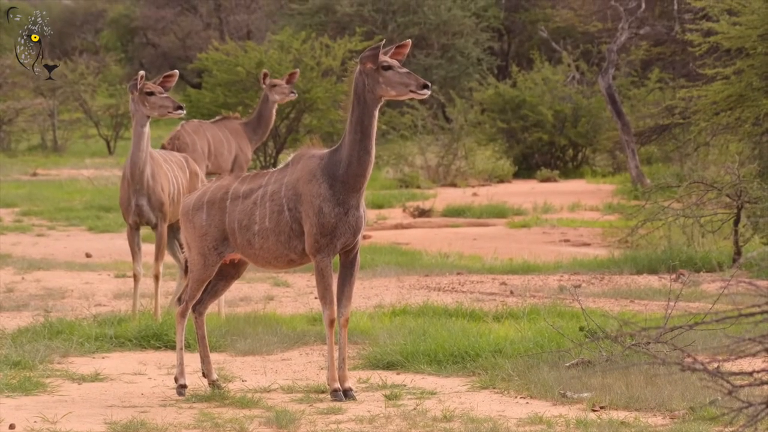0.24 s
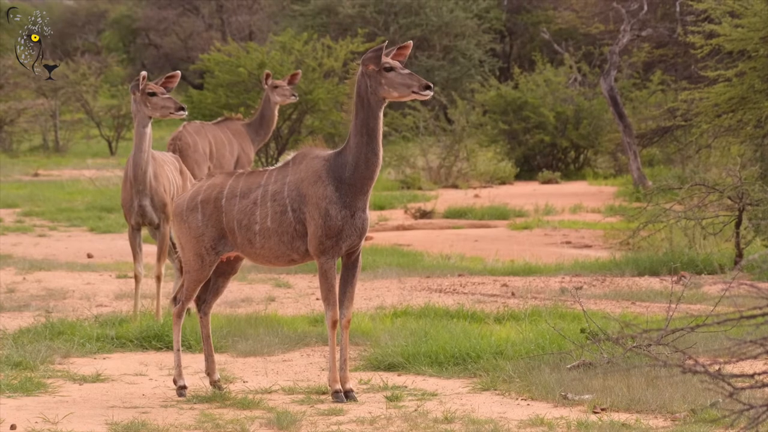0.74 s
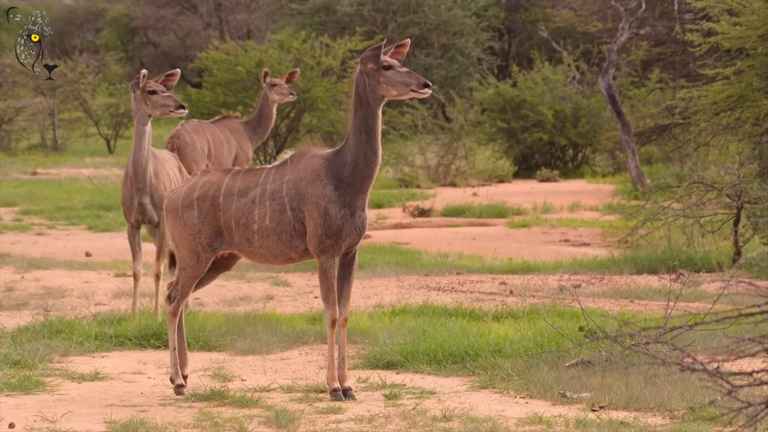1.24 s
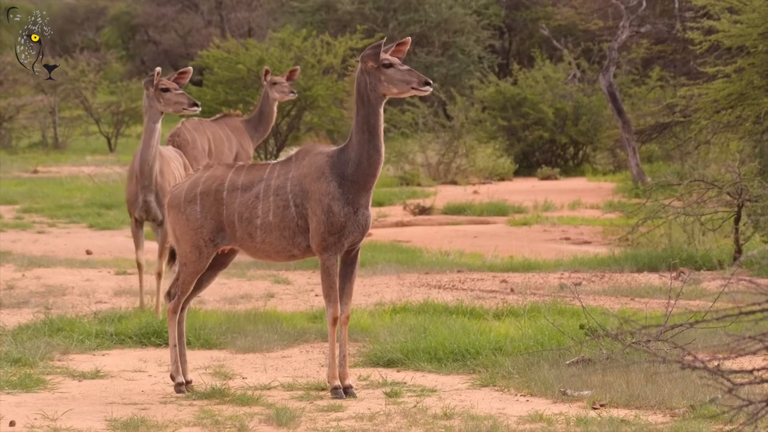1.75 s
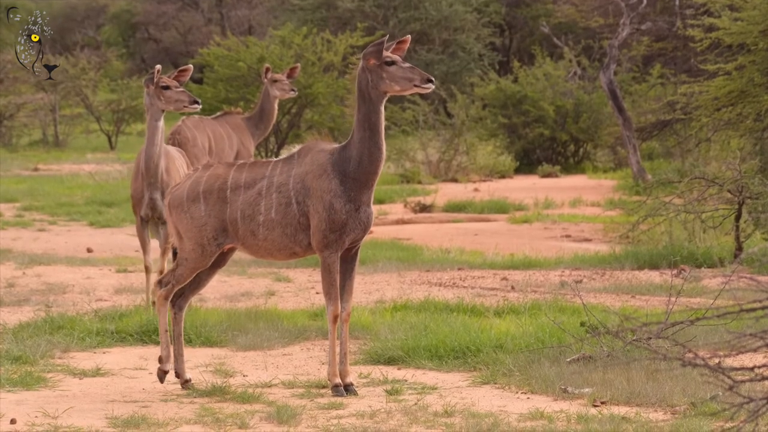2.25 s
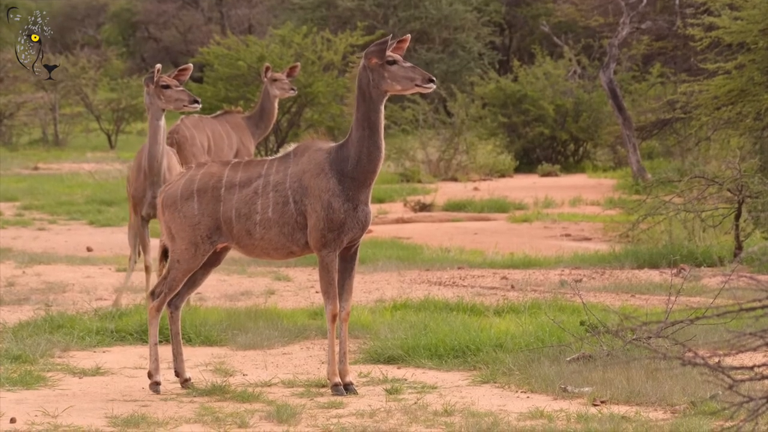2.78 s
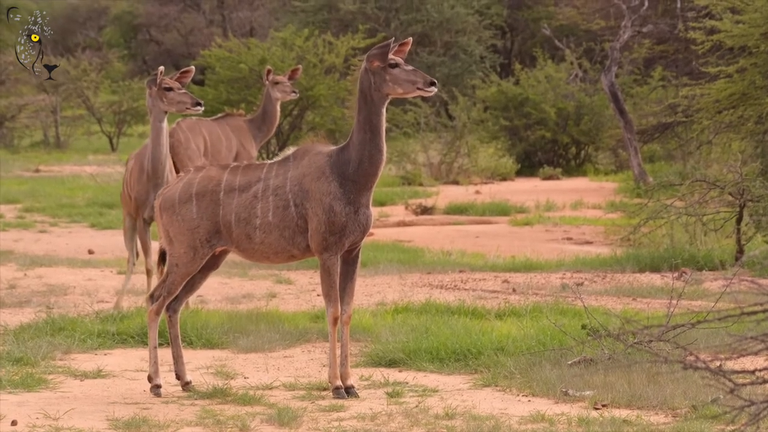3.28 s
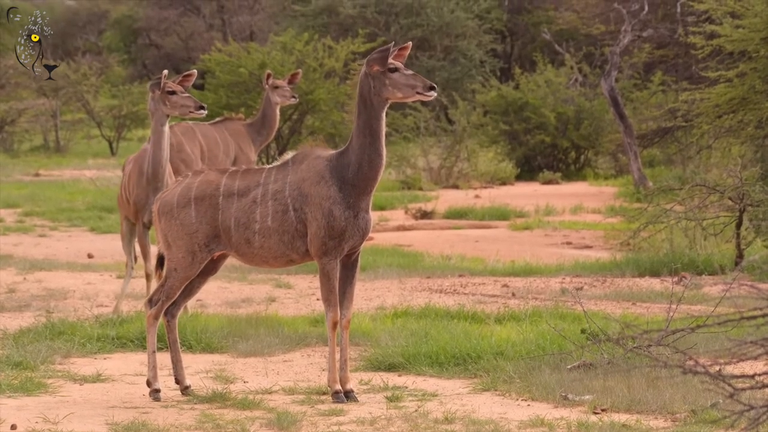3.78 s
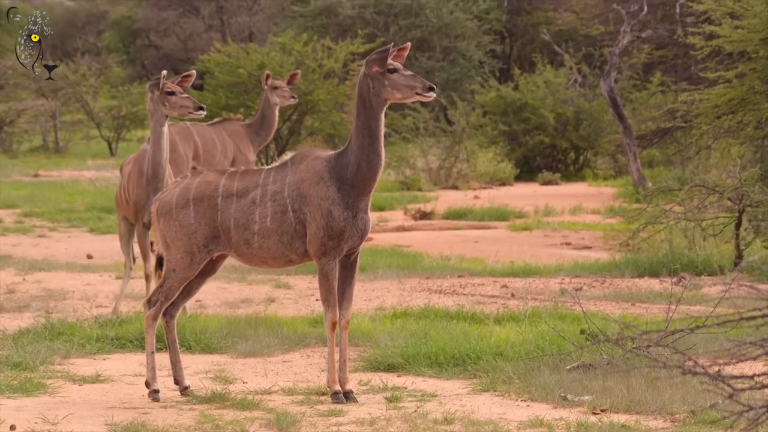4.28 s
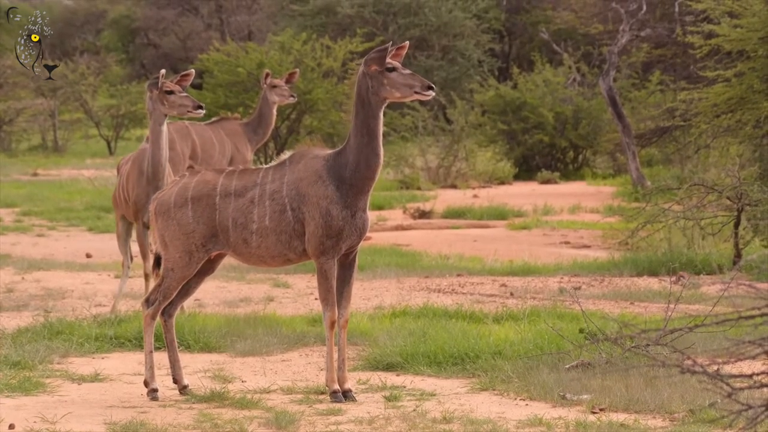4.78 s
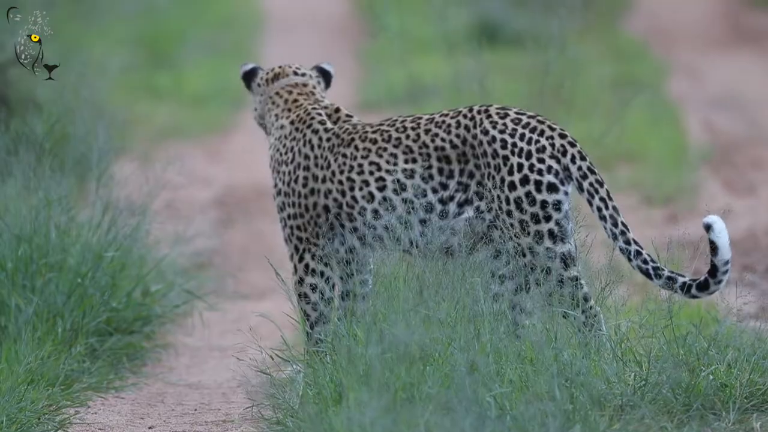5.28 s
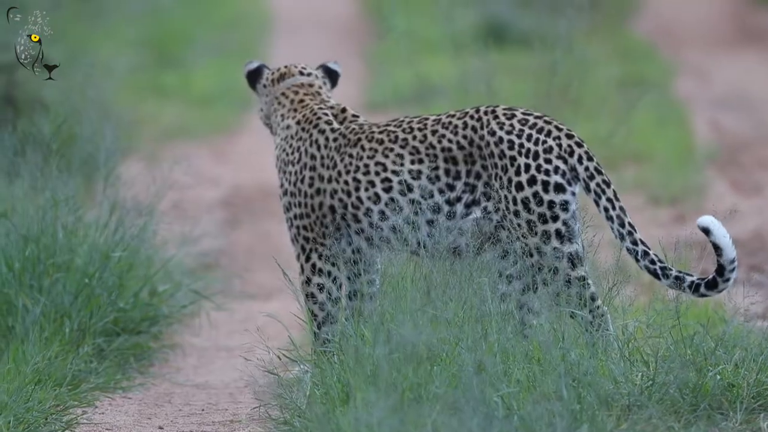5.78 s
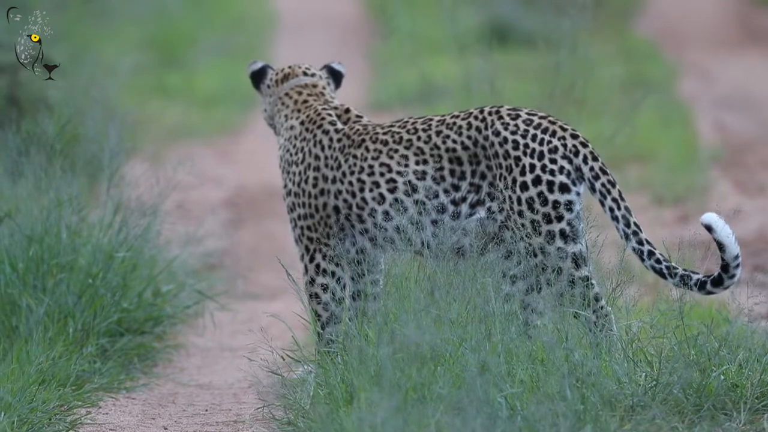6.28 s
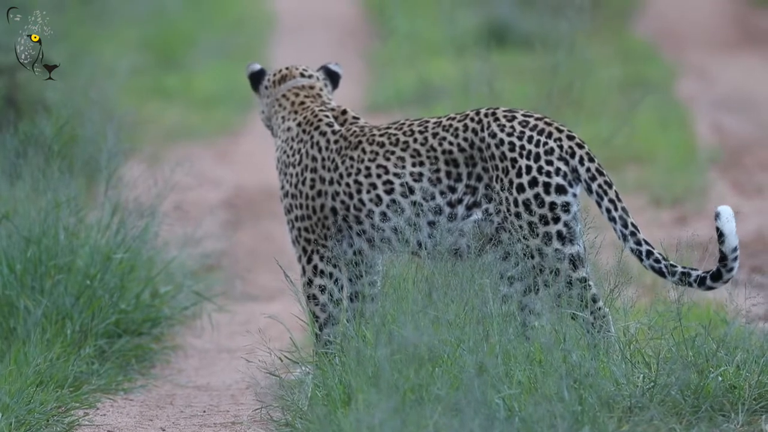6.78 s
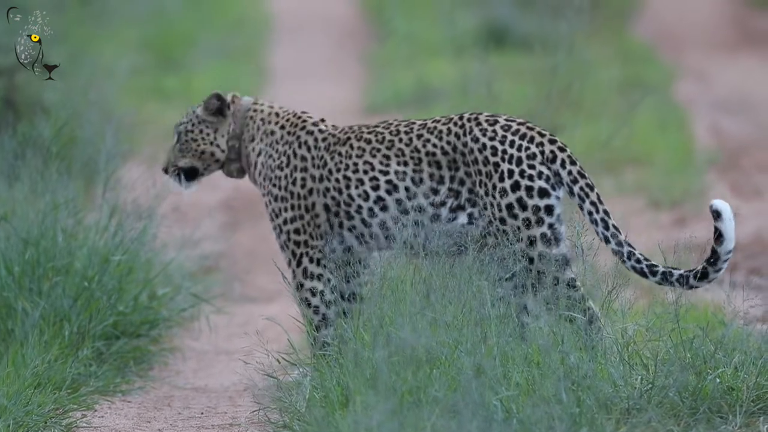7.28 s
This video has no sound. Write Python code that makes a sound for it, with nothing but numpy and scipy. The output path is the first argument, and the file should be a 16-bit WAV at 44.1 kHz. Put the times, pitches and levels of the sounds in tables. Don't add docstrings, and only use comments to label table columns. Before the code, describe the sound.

A dove coos in a regular cycle of one arched note, a throbbing trill and a short note, nearly pure in tone. Around it are faint distant birds, dry twig ticks and light wind rumble against a stereo microphone, stronger on the right. A raspy antelope alarm bark is already sounding at the start; another, equally loud and close, erupts near the end with scattered echoes.

```python
import sys
import numpy as np
from scipy import signal
from scipy.io import wavfile
from scipy.ndimage import uniform_filter1d

SR = 44100
rng = np.random.default_rng(int(sys.argv[2]) if len(sys.argv) > 2 else 0)


def voltage_ratio(decibels):
    exponent = np.asarray(decibels, float) / 20
    return 10 ** exponent


def unload_audio(sound):
    columns = np.transpose(np.atleast_2d(sound))
    steps = np.round(np.clip(columns, -1, 1) * 32767)
    wavfile.write(sys.argv[1], SR, steps.astype(np.int16))


N = 332514


def evened(x):
    return x / np.sqrt(np.mean(x ** 2) + 1e-20)


def read(points, hz):
    f, value = np.transpose(points)
    return np.interp(np.log(hz + 1), np.log(f + 1), value)


def unroll(rows):
    s, *columns = np.transpose(rows)
    t = np.arange(s[0], s[-1], 1 / SR)
    return s[0], [np.interp(t, s, c) for c in columns]


def add(mix, s, sound):
    sound = sound[..., max(round(-s * SR), 0):]
    part = mix[..., max(round(s * SR), 0):][..., :sound.shape[-1]]
    part += sound[..., :part.shape[-1]]


def resonate(x, hz, width_hz):
    turn = np.exp(2j * np.pi * np.cumsum(hz * np.ones(len(x))) / SR)
    r = np.exp(-np.pi * width_hz / SR)
    smooth = signal.lfilter([(1 - r) ** 2], [1, -2 * r, r * r], x / turn + 1e-18)
    return 2 * (turn * smooth).real


def tone(hz, level_db):
    ends = signal.windows.tukey(len(hz), min(1, 300 / len(hz)))
    return np.sqrt(2) * voltage_ratio(level_db) * ends * np.sin(2 * np.pi * np.cumsum(hz) / SR)


def noise(shape_db, patchy_db):
    draws = rng.standard_normal((3, N // 256 + 5, 2, 513))
    real, imaginary, patches = draws.transpose(0, 2, 3, 1)
    patches = evened(uniform_filter1d(uniform_filter1d(patches[0], 10, 0), 12, 1))
    z = (real + 1j * imaginary) * voltage_ratio(shape_db[:, :, None] + patchy_db * patches)
    return signal.istft(z, nperseg=1024, noverlap=768)[1][:, :N]


# pitch_hz [Hz], level_db [dB per Hz]
HUSH_SPECTRUM = [(60, 4.5), (100, 5.5), (200, 1), (400, -3.5), (630, -2.5), (1000, -7), (2000, -11),
                 (4000, -16), (6300, -20.5), (8500, -23), (10300, -29), (11800, -26.5), (13000, -21.5),
                 (16000, -22.5)]
# pitch_hz [Hz], side_re_mid_db [dB]
HUSH_SIDE_SPECTRUM = [(100, -24), (300, -9.5), (900, -14.5), (2500, -11), (5000, -18.5), (10000, -11),
                      (12500, -13.5), (16000, -26)]


def hush():
    hz = np.fft.rfftfreq(1024, 1 / SR)
    mid_db = read(HUSH_SPECTRUM, hz)
    side_db = mid_db + read(HUSH_SIDE_SPECTRUM, hz)
    mid, side = noise(np.array([mid_db, side_db]), patchy_db=.6)
    return voltage_ratio(-53.5) * np.array([mid + side, mid - side]) / np.std(mid)


# start_s [s, centre], half_width_s [s], level_db [dB], left_right_db [dB]
GUST_EVENTS = [(.2, 0.19, -49, -8), (.84, .08, -59, -5), (1.19, 0.074, -59.5, -18), (1.3, 0.029, -58, -4),
               (1.97, .15, -62.5, -6), (3.14, 0.093, -49.5, -20), (3.36, 0.086, -55, -9),
               (3.78, 0.11, -56.5, -5), (3.97, 0.077, -54.5, -18), (4.43, 0.078, -60, -1),
               (5.05, 0.091, -51.5, -19), (5.27, 0.11, -59.5, -1.5), (5.56, 0.14, -53, -15),
               (5.92, 0.033, -51.5, -15), (6.8, 0.1, -51.5, -11), (7.43, 0.025, -60, -13)]
# pitch_hz [Hz], level_db [dB per Hz]
BUFFET_SPECTRUM = [(8.8, -59), (15, -6), (32, 10.5), (54, -7.5), (113, -12.5), (145, -18), (231, -34),
                   (400, -42), (520, -60.5), (880, -120)]


def wind():
    hz, t = np.fft.rfftfreq(1024, 1 / SR), np.arange(N) / SR
    ports = noise(np.array([read(BUFFET_SPECTRUM, hz)] * 2), patchy_db=2.0)
    calm = (0, np.inf, -63, -5)
    power = 0
    for s, half_s, level_db, pan_db in GUST_EVENTS + [calm]:
        share = voltage_ratio(np.array([[pan_db], [-pan_db]]))
        swell = np.exp(-((t - s) / half_s) ** 2)
        power = power + share / share.sum() * voltage_ratio(2 * level_db) * swell
    return evened(ports) * np.sqrt(power) * voltage_ratio(14.5)


# start_s [s], peak_db [dB], pitch_hz [Hz, centre], width_hz [Hz], t60_s [s]
TWIG_TICKS = [
    (1.2, -45, 1900, 1200, .03),
    (1.408, -46, 11000, 9000, .008),
    (2.4415, -36, 13300, 2800, .006),
    (4.811, -42, 2000, 1400, .022),
    (5.2446, -44, 2400, 2200, .022),
    (5.594, -50, 11000, 7000, .008),
    (5.92, -43, 1900, 1500, .022),
]
HOOF_THUDS = [
    (0.739, -34, 397, 700, 0.076),
    (0.774, -31, 380, 1050, 0.12),
    (.78, -33.5, 142, 152, 0.057),
]
PORT_KNOCKS = [
    (0.776, -44, 2160, 2500, .025),
    (3.04, -37.5, 133, 109, 0.027),
    (3.312, -37.5, 98, 89, 0.11),
    (5.077, -35, 69.5, 69.4, 0.034),
]


def tick(s, peak_db, hz, width_hz, t60_s, pan_db=0):
    t = np.arange(6000) / SR
    burst = resonate(rng.standard_normal(len(t)) * voltage_ratio(-60 * t / t60_s), hz, width_hz)
    return s, voltage_ratio(peak_db + np.array([[pan_db], [-pan_db]]) / 2) * burst / abs(burst).max()


def whistle(level_db, hz, fuzz):
    blur = evened(resonate(rng.standard_normal(len(hz)), hz, 650))
    blur = voltage_ratio(level_db) * blur * signal.windows.tukey(len(hz), .3)
    return (1 - fuzz) * tone(hz, level_db) + fuzz * blur


# start_s [s], length_s [s], level_db [dB], first_hz [Hz], last_hz [Hz]
FAR_NOTES = [
    (2.36, .13, -63, 1790, 1830),
    (2.38, .07, -65, 2200, 2100),
    (2.58, .05, -63, 1800, 1750),
    (2.78, .08, -62, 1860, 1800),
    (4.93, .13, -63, 1760, 1850),
    (5.08, .12, -61.5, 1830, 1760),
    (5.26, .08, -64, 1850, 1850),
    (5.48, .12, -64, 1800, 1800),
]
QUICK_NOTES = [
    (.65, .018, -54, 2330, 2420),
    (.705, .025, -50, 3150, 2500),
    (.728, .028, -48.5, 1920, 2120),
    (.834, .064, -60, 3300, 1280),
    (3.038, .076, -59, 3400, 2250),
    (3.89, .1, -66, 1404, 1423),
]
HOARSE_SWOOPS = [
    (3.015, .115, -57.5, 6750, 3150),
    (3.02, .07, -63, 5600, 4300),
]


def drop(s, length_s, level_db, first_hz, last_hz, haste, delay, fuzz):
    u = np.arange(0, length_s, 1 / SR) / length_s
    pitch_hz = last_hz + (first_hz - last_hz) * np.exp(-(haste * u) ** delay)
    return s, whistle(level_db - 9 * (u - .2) ** 2, pitch_hz, fuzz)


# start_s [s], length_s [s], level_db [dB], first_hz [Hz], flick_hz [Hz]
HELD_NOTES = [
    (.455, .137, -50, 3130, -900),
    (.44, .128, -55.5, 3610, -130),
    (.45, .126, -61.5, 1820, -150),
    (.653, .054, -53, 2050, 190),
]


def held(s, length_s, level_db, hz, flick_hz):
    sag_hz_per_s, swell_db = 850, -12
    u = np.arange(0, length_s, 1 / SR) / length_s
    flick = u ** 10
    pitch_hz = hz - sag_hz_per_s * length_s * u + flick_hz * flick
    level_db = level_db + swell_db * np.exp(-u / .15) - 4 * flick
    return s, whistle(level_db, pitch_hz, fuzz=.07 + .5 * flick)


# start_s [s after onset], level_db [dB], pitch_hz [Hz]
ARCH_SHAPE = [(0, -6, 713), (.006, 1.5, 830), (.016, -1.5, 942), (.032, -2.5, 985), (.064, 0.5, 905),
              (.074, -6, 792), (.088, -7.5, 690)]
SHORT_SHAPE = [(0, -16, 680), (.008, -5, 760), (.02, 0, 825), (.032, -2, 800), (.042, -14, 720)]
# start_s [s], level_db [dB], stretch [factor], pitch [factor]
ARCH_NOTES = [
    (1.038, -43, 1.04, 1.01),
    (2.461, -43, 1.01, 1.017),
    (3.884, -43.5, 1.01, 1.001),
    (5.326, -43.5, 1.01, 1.013),
]
SHORT_NOTES = [
    (.617, -41.5, 0.96, 1),
    (2.035, -43, 0.86, 0.99),
    (3.46, -39.5, 0.96, 1.007),
    (4.888, -43, 0.86, 1.001),
    (6.312, -43, 0.9, 1.001),
]


def coo(shape, s, level_db, stretch, pitch):
    _, (db, hz) = unroll(np.array(shape) * [stretch, 1, pitch])
    return s, tone(uniform_filter1d(hz, size=150), db + level_db)


# start_s [s, third throb], opening_pace [factor], rest_pace [factor], level_db [dB]
DOVE_TRILLS = [
    (.159, 1, .994, -44),
    (1.563, 1.08, .99, -43.5),
    (2.9975, 1.04, 1, -43),
    (4.409, .98, 1, -44.5),
    (5.829, .95, .997, -43.5),
    (7.274, 1.05, 1.003, -43.5),
]
# throb [number], after_s [s after third throb], level_db [dB]
TRILL_COURSE = [(-.3, -.093, -1.5), (1.01, -.057, -0.2), (3, 0, -2), (13, .322, 1), (14, .356, -1.3),
                (15, .39, -3.5), (16, .424, -26)]
# throb [number], top_hz [Hz], trough_hz [Hz], trough_db [dB]
TRILL_RANGE = [(0, 930, 680, -7), (1.3, 1080, 730, -1.5), (2.3, 1080, 740, -3), (3.5, 1055, 670, -11),
               (9, 1015, 680, -11), (13, 950, 700, -11), (14.5, 850, 700, -11), (16, 730, 630, -11)]
THROB_CYCLE = [(0, .08, 1), (.26, .06, 1.2), (.3, .35, .15), (.36, .85, -.1), (.43, 1, .55), (.5, .76, 0),
               (.66, .5, -.05), (.73, .3, .6), (.8, -.02, 1.2)]


def trill(s, opening, pace, level_db):
    count, after_s, course_db = np.transpose(TRILL_COURSE)
    times = s + after_s * np.where(after_s < 0, opening, pace)
    s, (number, level_db) = unroll(np.transpose([times, count, course_db + level_db]))
    throb, top_hz, trough_hz, trough_db = np.transpose(TRILL_RANGE)
    u, height, sunk = np.transpose(THROB_CYCLE)
    phase = (number + .5) % 1
    throb_index = np.clip(number + .5, 0, 19).astype(int)
    vary = rng.standard_normal((20, 2))[throb_index].T
    low_hz = np.interp(number, throb, trough_hz)
    high_hz = np.interp(number, throb, top_hz) + 25 * vary[1]
    hz = low_hz + (high_hz - low_hz) * np.interp(phase, u, height, period=1)
    sink_db = np.interp(number, throb, trough_db) * np.interp(phase, u, sunk, period=1)
    level_db = level_db + 1.3 * vary[0] + sink_db
    return s, tone(uniform_filter1d(hz, size=60), uniform_filter1d(level_db, size=60))


# pitch_hz [Hz], t60_s [s]
BUSH_DECAY = [(200, 0.4), (800, 0.58), (3000, 0.46), (10000, 0.28)]


def bush(x, first_s, t60_scale):
    taps = np.zeros((2, SR // 2))
    at = np.arange(round(first_s * SR), SR // 2 - 22, 22)
    at = at + rng.integers(0, 22, (2, len(at)))
    np.put_along_axis(taps, at, rng.choice([-1., 1.], at.shape), 1)
    hz, t, z = signal.stft(taps, SR, nperseg=256)
    t60_s = t60_scale * read(BUSH_DECAY, hz)[:, None]
    tail = signal.istft(z * voltage_ratio(-60 * t / t60_s), SR, nperseg=256)[1]
    return signal.fftconvolve(x[None], tail / np.linalg.norm(tail[0]), axes=1)[:, :N]


ECHO_ENDS = [.4, 7.043]


def bark_echoes(kudu):
    t = np.arange(N) / SR
    gate_s = np.repeat(ECHO_ENDS, 2) + [0, .004, -1, 0]
    open_gate = np.interp(t, gate_s, [1, 0, 0, 1]) * (t < ECHO_ENDS[1])
    leaves = evened(uniform_filter1d(rng.standard_normal(N), size=120))
    echoes = bush(kudu * leaves, .05, 1.8) * np.minimum(1, 20 * open_gate)
    band = signal.butter(2, [550, 3500], "band", fs=SR, output="sos")
    echoes = voltage_ratio(-22.0) * signal.sosfilt(band, echoes)
    return echoes * voltage_ratio(5 * (t < 1))


# start_s [s], level_db [dB, effort], strain [0-1]
BARK_CURVES = [
    [(-.04, -16, 1), (.03, -22, 0.76), (.06, -19.5, 0.71), (.135, -22, 0.42), (.155, -25.5, .3),
     (.185, -35.5, 0.2), (.23, -54, .1)],
    [(6.628, -51, 0.1), (6.663, -32, .45), (6.699, -24.5, 0.96), (6.74, -20.5, 0.89), (6.83, -20, 0.75),
     (6.877, -21, 0.74), (6.93, -25.5, 0.2), (6.965, -35, 0.44), (6.99, -50, .4)],
]
# pitch_hz [Hz], width_hz [Hz], level_db [dB]
THROAT_MODES = [
    [[(200, 140, -7.5), (273, 31, 3.5), (339, 28, -2), (481.6, 65, 3.5)], [(648, 75, -5), (830, 43, -9),
     (974, 78, -7.5), (1205, 170, -15.5)], [(1637, 160, 1.5), (2120, 320, -8), (3340, 1070, -22)],
     [(4660, 560, 3), (5500, 400, 4), (6070, 1400, -6), (9100, 3000, -13.5)]],
    [[(160, 57, -3.5), (250.4, 45, 3.5), (345, 33, -1.5), (454, 47, 2), (562, 24, -3)], [(804, 150, -10),
     (965, 27, -8), (1052, 24, -17), (1224, 180, -16)], [(1684, 108, 0), (2150, 270, -12),
     (3010, 480, -19)], [(4720, 180, 9.5), (5370, 380, -0.5), (6580, 1200, -8), (9500, 3400, -18.5)]],
]
LIPS_PART = [-.085, 6.66]
# level_db [dB re chest], slack_db [dB lost when slack]
STRAIN_LEVELS = [
    (-2, -9),
    (-7, -20.5),
    (-28, -21),
]


def bark(rows, throat, lips_s):
    lips_shut_db, lips_opening_s = -27, .011
    jaw_open, jaw_shut, jaw_closing_s = 1.14, .89, .12
    s, (chest_db, strain) = unroll(rows)
    n = len(chest_db)
    since = s + np.arange(n) / SR - lips_s
    slide = jaw_shut + (jaw_open - jaw_shut) * np.exp(-np.maximum(since, 0) / jaw_closing_s)
    mouth_db, rasp_db, hiss_db = [db + slack_db * (1 - strain) for db, slack_db in STRAIN_LEVELS]
    mouth_db = mouth_db + lips_shut_db * np.clip(-since / lips_opening_s, 0, 1)
    half_closed = .955
    hiss_db = hiss_db + 5.4 * np.exp(-((slide - half_closed) / .015) ** 2)

    wobble = evened(uniform_filter1d(rng.standard_normal(n), 300))
    turns = np.cumsum(115 * np.exp(.45 * wobble)) / SR
    slaps = np.diff(np.floor(turns), prepend=0) * voltage_ratio(2.0 * rng.standard_normal(n))
    puffs = (.6 + np.exp(-(turns % 1) / .35)) * rng.standard_normal(n)
    voice = .45 * evened(slaps) + .75 * evened(puffs)

    out = 0
    places = zip(("chest", "mouth", "rasp", "hiss"), throat, (0, mouth_db, rasp_db, hiss_db))
    for place, modes, rel_db in places:
        waver = rng.standard_normal((len(modes), n))
        waver = uniform_filter1d(uniform_filter1d(waver, 1500), 1500)
        hz = [f * (1 + .025 * evened(w)) for (f, _, _), w in zip(modes, waver)]
        widths = [width for _, width, _ in modes]
        levels = [db for _, _, db in modes]
        if place == "chest":
            weak_db = .6 * np.minimum(chest_db + 26, 0)
            levels[:3] = [db + weak_db for db in levels[:3]]
        if place == "mouth":
            hz[-1] = hz[-1] * slide
        if place == "hiss":
            levels[0] = levels[0] + 4 - 160 * abs(slide - half_closed)
        drive = puffs if place == "hiss" else voice
        part = 0
        for k, (mode_hz, width, db) in enumerate(zip(hz, widths, levels)):
            part = part + (-1) ** k * voltage_ratio(db) * resonate(drive, mode_hz, 1.31 * width)
        steady = np.sqrt(uniform_filter1d(part ** 2, size=2600))
        out = out + voltage_ratio(chest_db + rel_db) * part / steady
    out = signal.sosfilt(signal.butter(3, 135, "high", fs=SR, output="sos"), out)
    return s, out * np.minimum(1, np.arange(n, 0, -1) / 400)


def scene():
    kudu, birds, twigs = np.zeros(N), np.zeros(N), np.zeros((2, N))
    for row in TWIG_TICKS + HOOF_THUDS:
        add(twigs, *tick(*row))
    for row in PORT_KNOCKS:
        add(twigs, *tick(*row, pan_db=-16.5))
    for row in FAR_NOTES:
        add(birds, *drop(*row, haste=2, delay=1, fuzz=.6))
    for row in QUICK_NOTES:
        add(birds, *drop(*row, haste=4.5, delay=1, fuzz=.25))
    for row in HOARSE_SWOOPS:
        add(birds, *drop(*row, haste=3, delay=2, fuzz=.95))
    for row in HELD_NOTES:
        add(birds, *held(*row))
    for shape, notes in ((ARCH_SHAPE, ARCH_NOTES), (SHORT_SHAPE, SHORT_NOTES)):
        for row in notes:
            add(birds, *coo(shape, *row))
    for row in DOVE_TRILLS:
        add(birds, *trill(*row))
    for row in zip(BARK_CURVES, THROAT_MODES, LIPS_PART):
        add(kudu, *bark(*row))

    near = bush(kudu, .00095, .068)[0]
    treble = signal.sosfilt(signal.butter(4, 480, "high", fs=SR, output="sos"), near)
    side = voltage_ratio(-13) * treble + voltage_ratio(-29) * near
    barks = kudu + np.array([side, -side]) + bark_echoes(kudu)
    t = np.arange(N) / SR
    slap = voltage_ratio(-20) * np.roll(birds, round(.028 * SR)) * (t > .1)
    far = voltage_ratio(-15) * bush(birds, .02, .4).mean(0)
    return barks + birds + slap + far + twigs + hush() + wind()


def low_pass(x):
    return signal.sosfilt(signal.butter(12, 15770, fs=SR, output="sos"), x)


def record(dry):
    soft = .45 * np.tanh(dry / .45)
    return low_pass(soft)


dry = scene()
out = record(dry)
unload_audio(out)
```